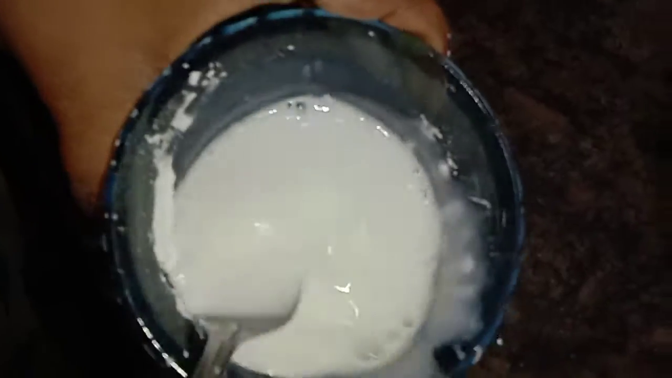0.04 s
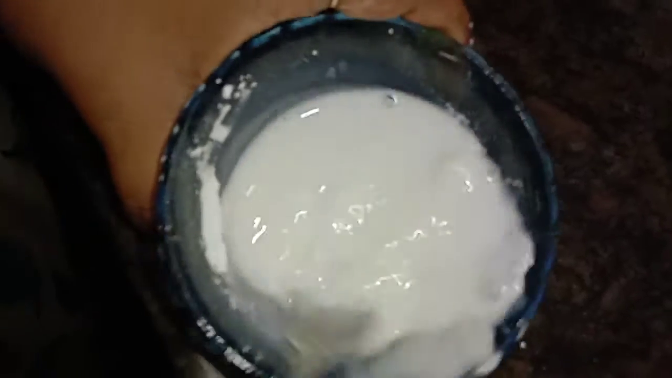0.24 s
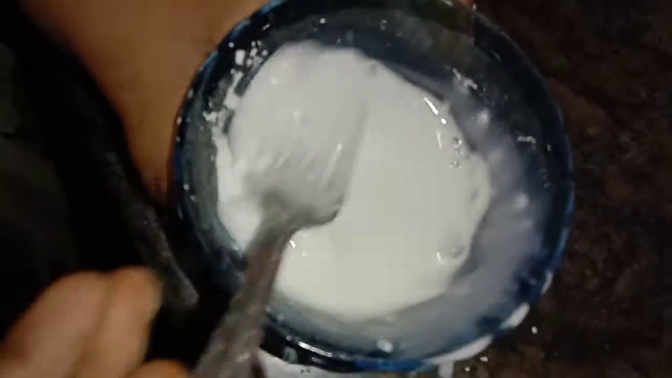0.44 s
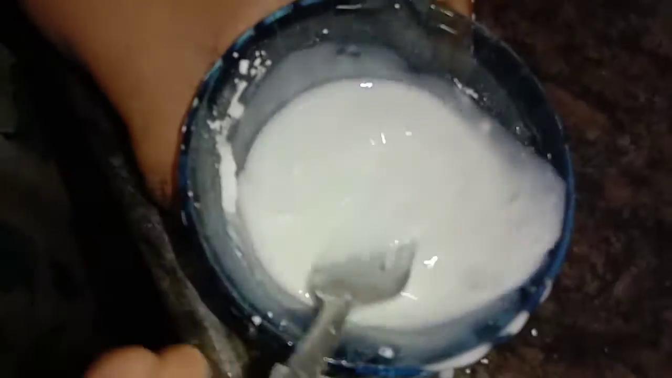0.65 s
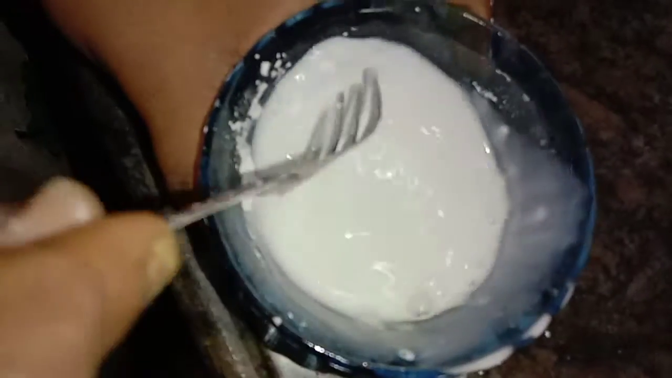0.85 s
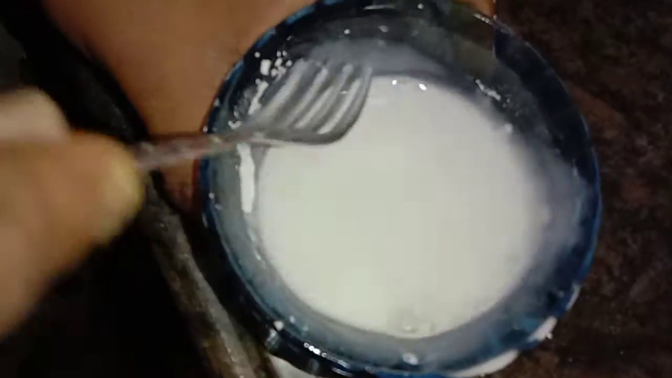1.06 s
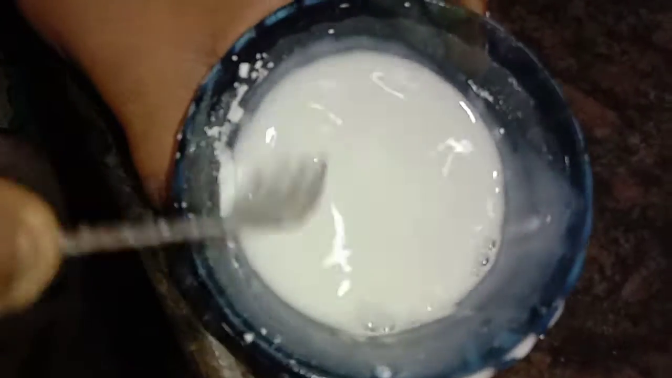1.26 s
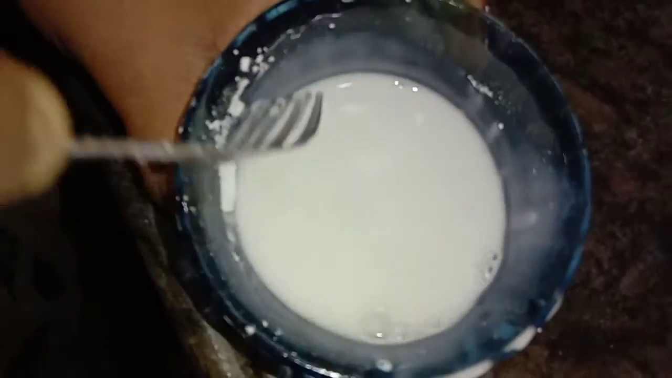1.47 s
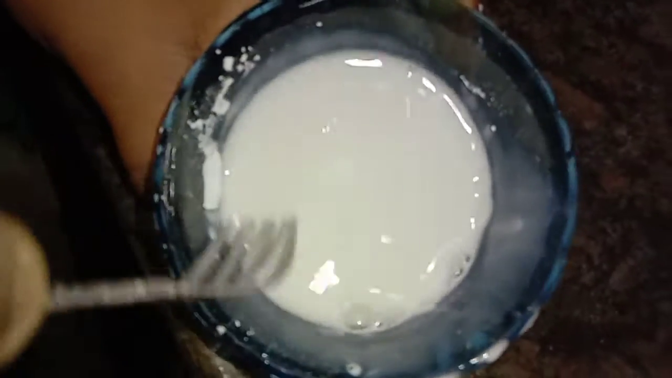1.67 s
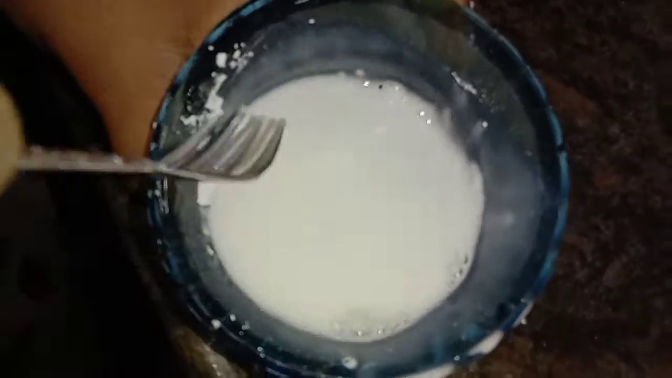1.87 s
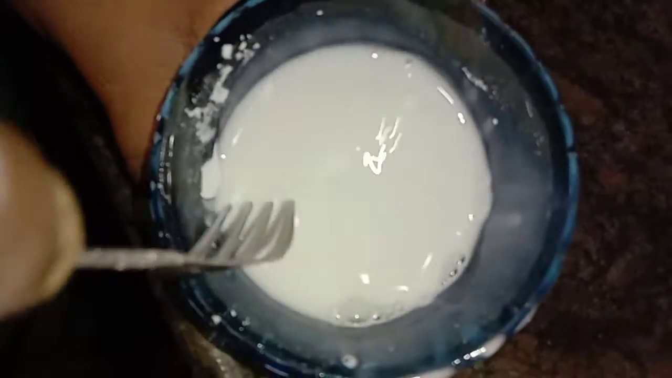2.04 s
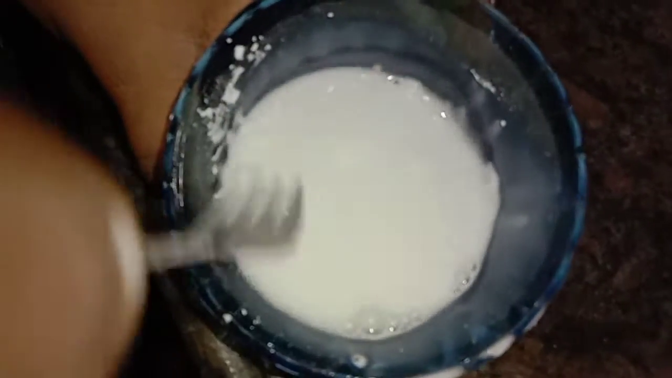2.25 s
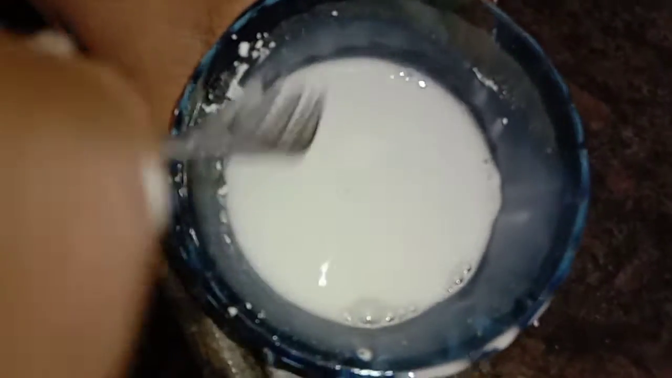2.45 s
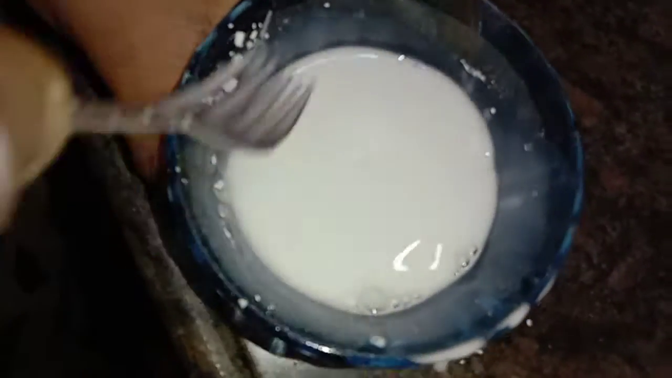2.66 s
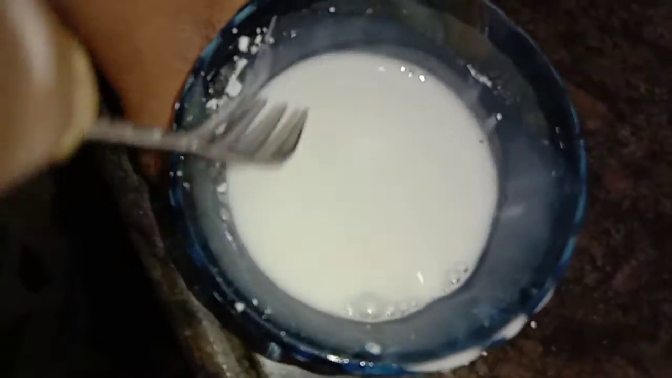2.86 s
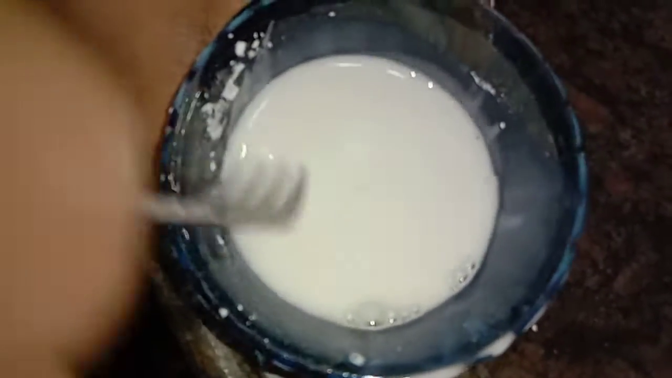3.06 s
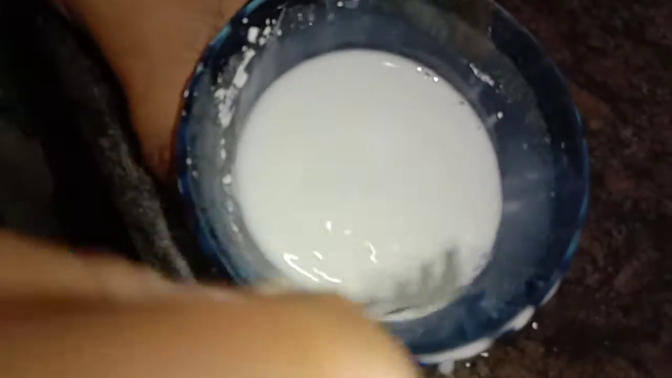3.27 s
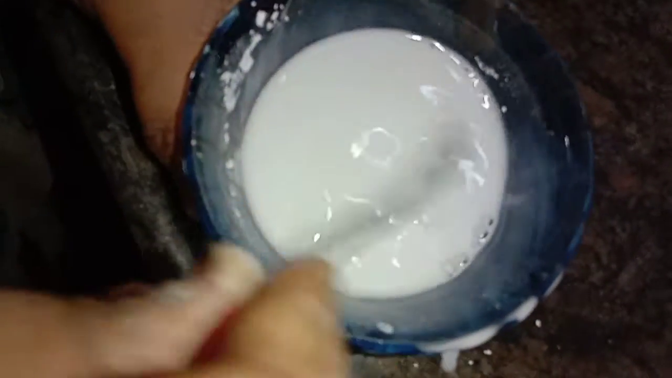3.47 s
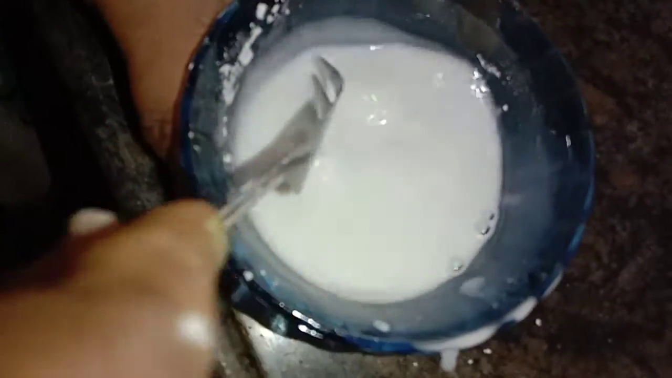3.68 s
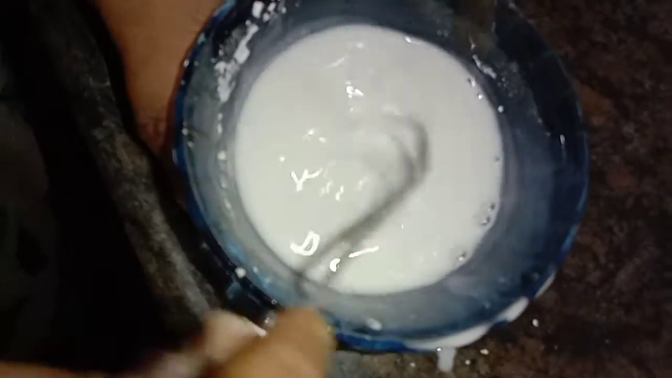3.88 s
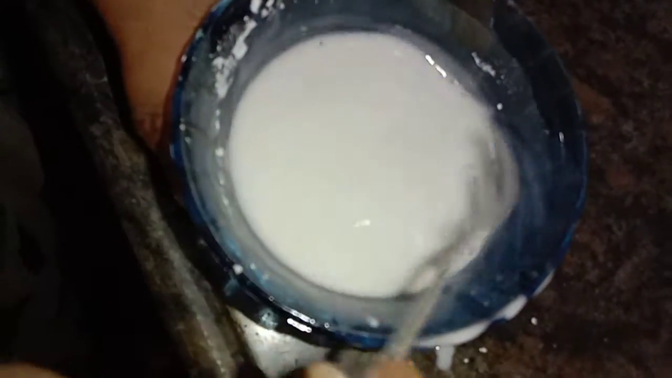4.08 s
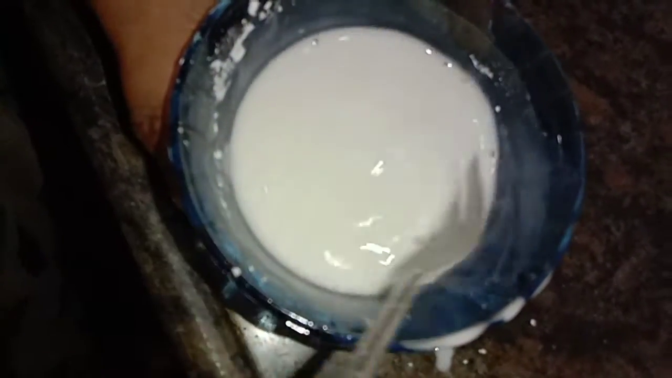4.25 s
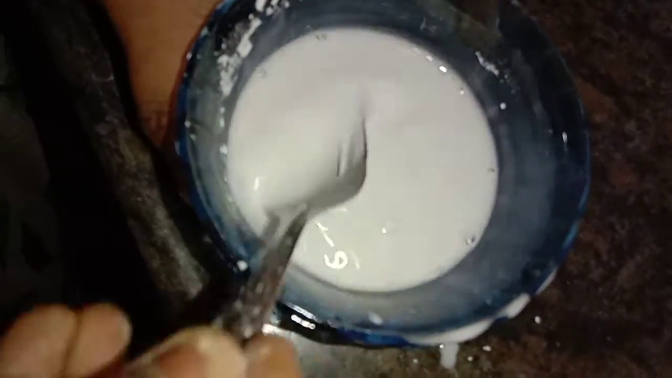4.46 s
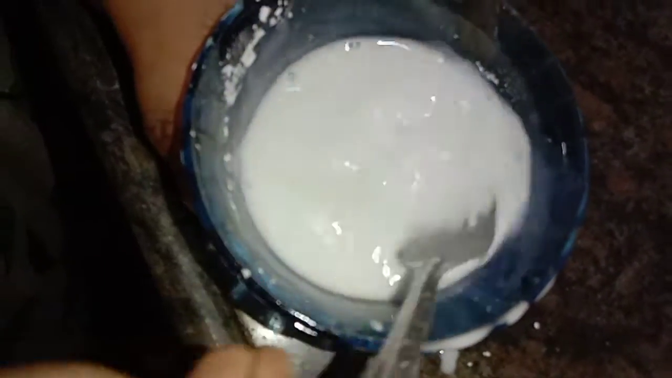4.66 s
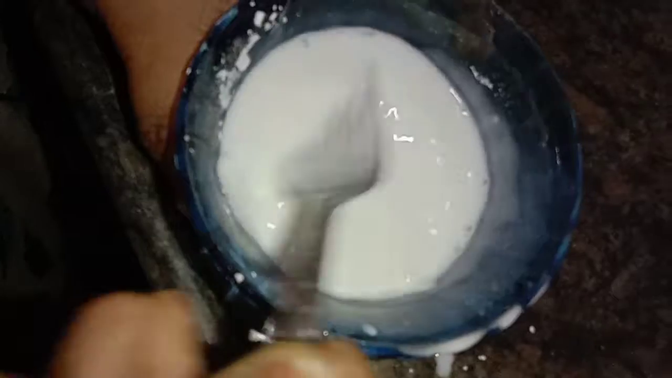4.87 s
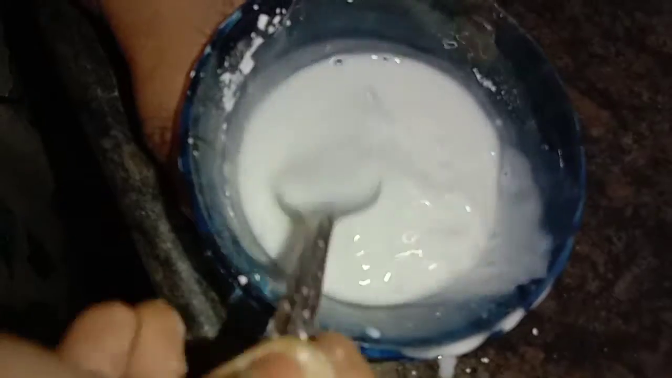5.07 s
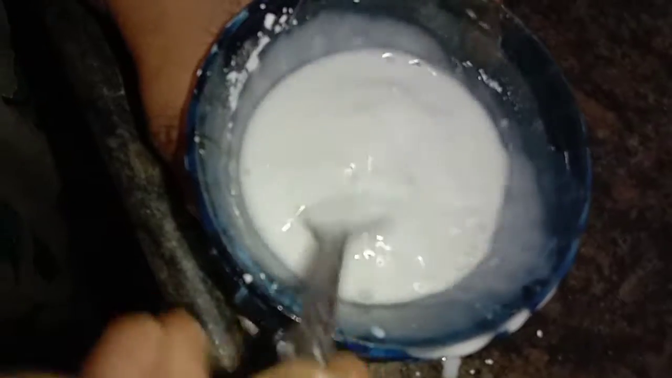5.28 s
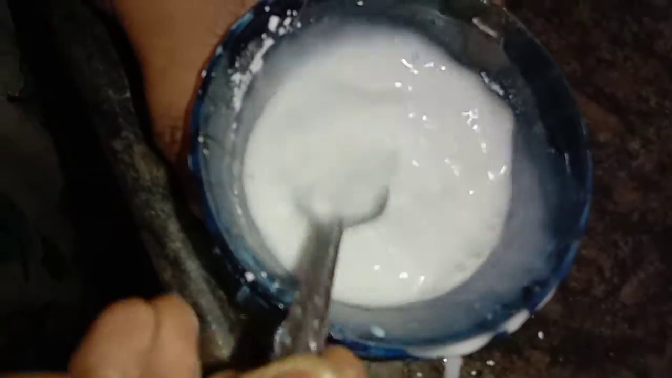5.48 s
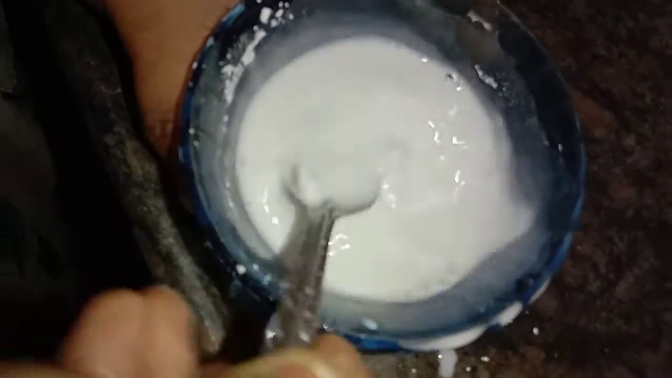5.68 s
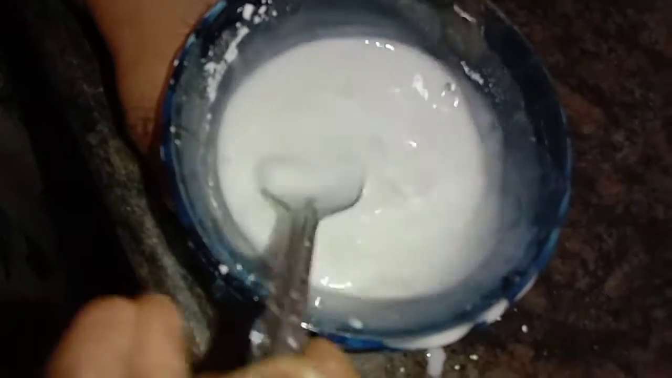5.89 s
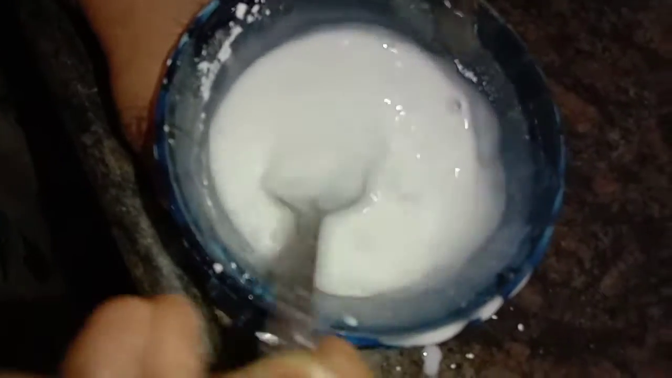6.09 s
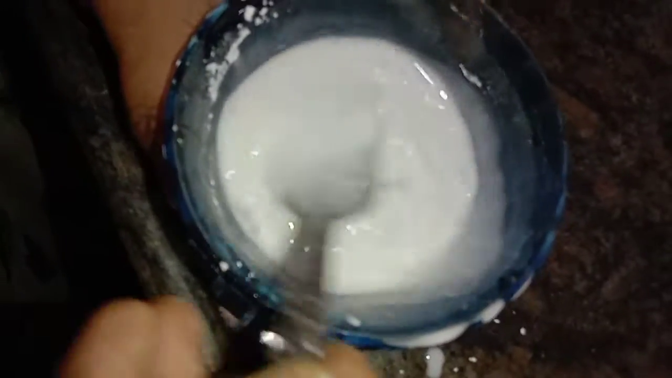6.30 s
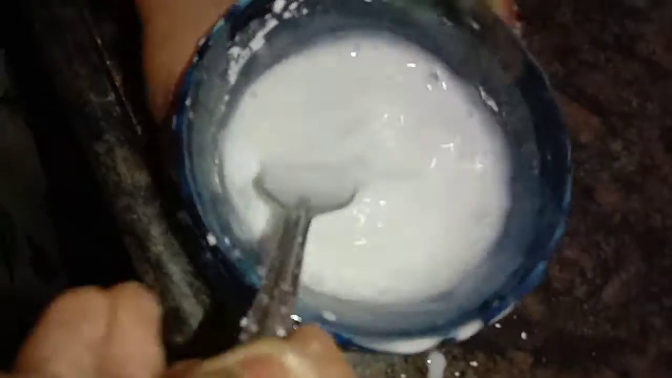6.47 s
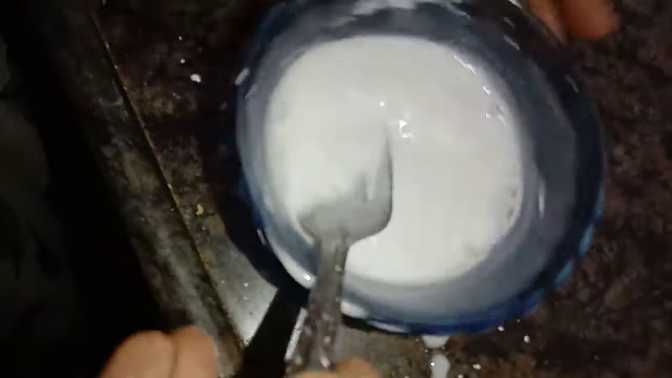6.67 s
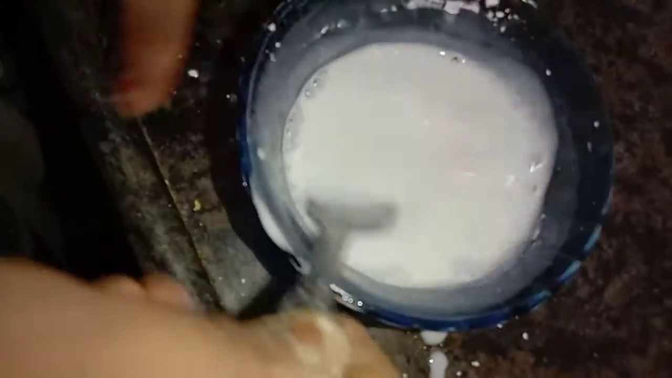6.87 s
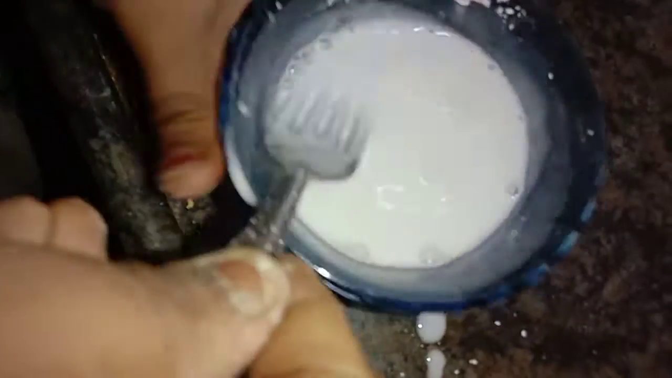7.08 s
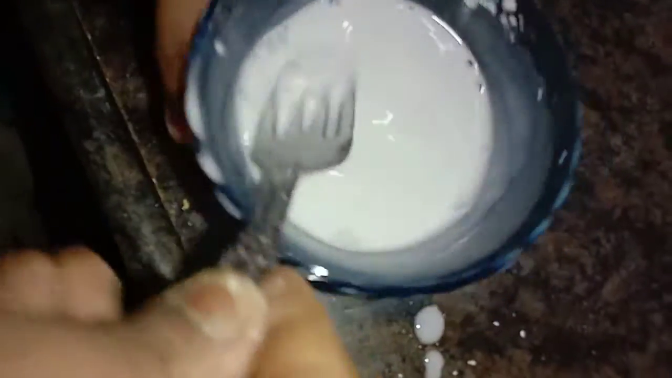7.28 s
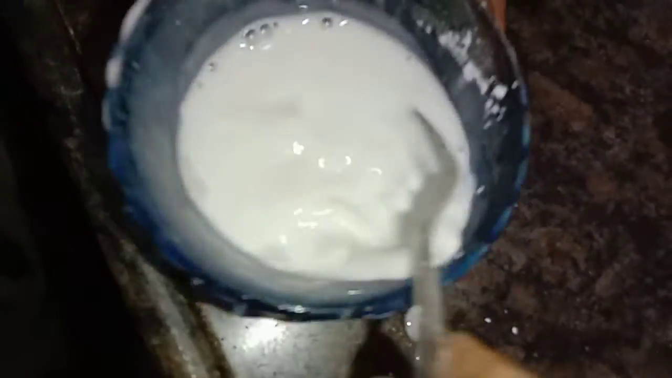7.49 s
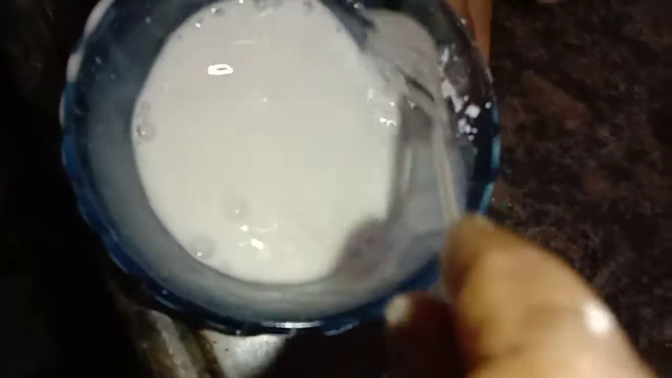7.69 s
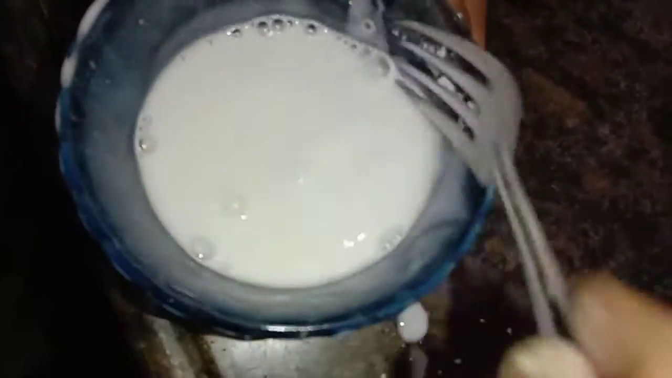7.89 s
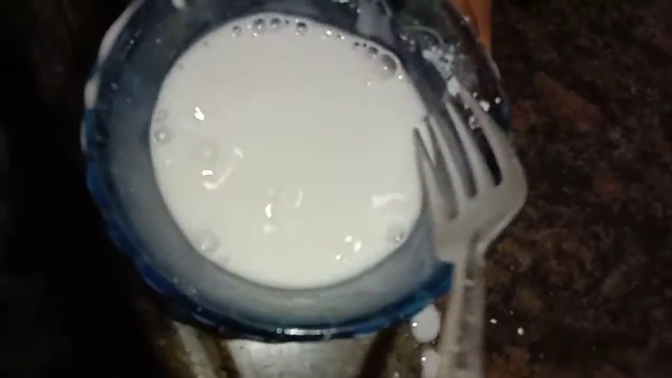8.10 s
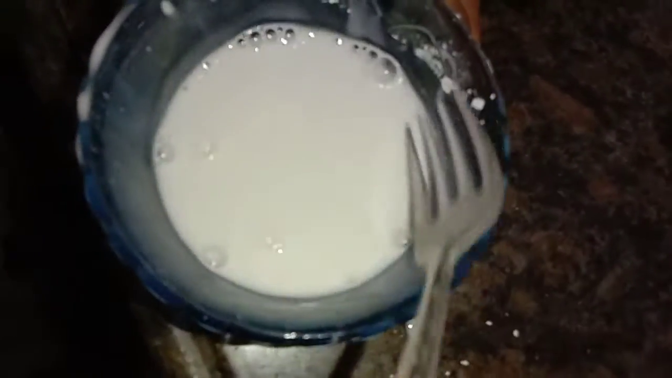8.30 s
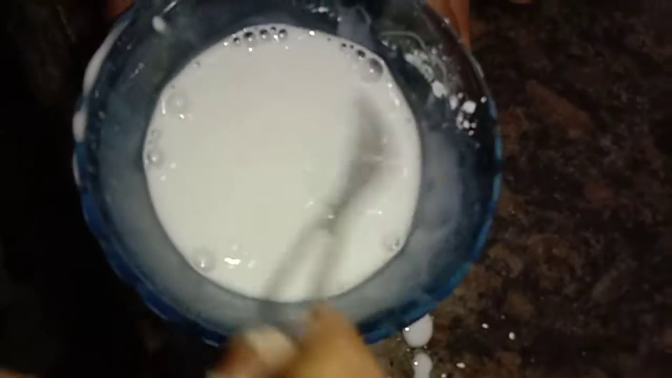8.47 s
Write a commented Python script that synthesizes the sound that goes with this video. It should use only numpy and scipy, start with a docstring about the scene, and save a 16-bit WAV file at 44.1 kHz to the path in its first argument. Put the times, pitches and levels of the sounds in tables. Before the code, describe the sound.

A metal fork clinks and scrapes quickly against a small glass bowl while thin batter sloshes and gulps, over faint household hiss in a hard-walled kitchen.

```python
"""Metal knocks and drags on glass: a fork stirs thin batter in a small hand-held bowl, in a hard-walled kitchen.
Each knock rings the modes of the bowl, damped by batter and hand; uneven slips of the tines ring them too.
Slaps, gulps and ticks are shaped noise and gliding tones; the room answers with noise dying band by band.
Behind lie sloshing, household hiss and hum, all filtered noise, and one thin falling chirp far off.
A look-ahead limiter ducks around loud knocks; the sound is thinned at the bottom and ends steeply near 16 kHz."""
import sys
import numpy as np
from scipy import signal
from scipy.fft import rfft, irfft, next_fast_len
from scipy.io import wavfile
from scipy.ndimage import uniform_filter1d, minimum_filter1d

SR = 44100
rng = np.random.default_rng(int(sys.argv[2]) if len(sys.argv) > 2 else 0)


def waveform_to_disk(signal):
    """Save audio, clipped to [-1, 1], as 16-bit WAV at the path in sys.argv[1]."""
    frames = np.transpose(np.atleast_2d(signal))
    scaled = np.clip(frames, -1, 1) * 32767
    samples = np.round(scaled).astype(np.int16)
    wavfile.write(sys.argv[1], SR, samples)


N = 376613

# Fork on glass. Each row: start in seconds, level of the main treble modes in dB, then low, middle and top
# modes in dB against it, favoured middle and treble pitch in Hz (set by the struck spot), ring length as a factor.
FORK_KNOCKS = [(0.022, -20, -36, -9, -19, 3340, 6000, 0.24), (0.117, -43, 7, 3, -22, 3620, 5700, 1),
               (0.1819, -5.5, -28, -11.5, -8, 3400, 6420, 0.21),
               (0.2744, -6.5, -31, -20, -24, 3120, 4980, 0.41),
               (0.3694, -40, -25, -12, -7, 3300, 7760, 0.78),
               (1.057, -9.5, -29, -12, -7.5, 3460, 7100, 1.5),
               (1.1634, -7, -16, -13.5, -8, 2740, 6410, 0.78),
               (1.1653, -5, -43, -10, -16, 3500, 6570, 0.69),
               (1.235, -13, -16.5, -9.5, -12, 2550, 6600, 2.1),
               (1.452, -26.5, -35, -3, -6, 3500, 8050, 1.8),
               (1.5837, -6.5, -14, -7.5, -4.5, 3550, 6250, 0.59),
               (1.627, -14.5, -24, -13, -14, 3620, 5090, 1.36),
               (1.7657, -37.5, -18, 0.5, -2, 3670, 6370, 1.8),
               (1.7893, -11.5, -23.5, -23.5, -15, 3570, 6450, 0.76),
               (1.8404, -32.5, -24, -5, -5, 3670, 7160, 1.3),
               (1.921, -12.5, -20.5, -9, -14, 3626, 6000, 2.3),
               (1.969, -17.5, -37, -27, -12, 3530, 6900, 0.82),
               (2.068, -26.5, -36, -3.5, -16, 3580, 5350, 3.1),
               (2.232, -0.5, -20, -18.5, -17, 3570, 6430, 0.76),
               (2.371, -24.5, -25, -4, -7, 3590, 4660, 3.2), (2.4019, -26, -2, -1, -1, 3600, 6100, 0.54),
               (2.712, -16.5, -16.5, -10, -7.5, 3650, 6000, 1.4),
               (2.786, -14, -23, -6, -5, 3580, 6350, 0.78),
               (2.8534, -26.5, -15, -8.5, -4.5, 2920, 6050, 1.4),
               (3.0565, -8.5, -24, -12, -7.5, 3570, 6060, 2),
               (3.0799, -10, -26, -14, -9.5, 3580, 5650, 3.5), (3.14, -29, -18, 1, -21, 2684, 5750, 1.3),
               (3.1604, -24, -13, -7.5, 0, 2730, 5020, 1.4), (3.2047, -8, -23, -12.5, -6, 3140, 7020, 0.71),
               (3.216, -14.5, -25, -9, -0.5, 2380, 7430, 1.9), (3.299, -19, -14, -4.5, -9, 3565, 8050, 1.2),
               (3.3468, -37, 20.5, 21, -26, 3080, 5350, 0.45),
               (3.5206, -3, -29.5, -15.5, -12, 3340, 8000, 0.31),
               (3.5336, -24, -29, -2.5, -14, 3080, 4650, 0.63), (3.58, -32, -30, -23, -6, 3300, 7850, 0.6),
               (3.8032, -20, -39, -13, -23, 3410, 5530, 7.5),
               (3.8166, -13, -31, -16.5, -15.5, 3470, 5760, 1.5),
               (3.865, -23, -33, -15, -11, 3080, 7050, 0.95), (4.09, -37, -10, -10, -8, 3280, 7900, 1.4),
               (4.3977, -34.5, -11, -8, -11, 3300, 6100, 1.7),
               (4.627, -16.5, -26.5, -12.5, -6, 3490, 5830, 0.69),
               (4.7334, -7.5, -22, -7.5, -7, 3540, 6340, 0.79),
               (4.7436, -10.5, -15.5, -2.5, -6.5, 3230, 6400, 0.7),
               (4.7679, -5, -23.5, -5, -13, 3623, 6580, 0.92),
               (4.7964, -21.5, -18, -10, -21, 3300, 6400, 2.5),
               (4.934, -22.5, -27, -14, -30, 2780, 7100, 0.98),
               (4.9492, -33, -24, -13, -18, 3150, 5530, 1.4),
               (4.961, -38, -16, -16, -1.5, 2790, 6300, 0.67),
               (5.175, -45, -18, 13.5, -41, 3530, 5050, 0.51), (5.218, -36, -25, 1, -25, 3020, 5150, 0.61),
               (5.2278, -14.5, -15, -8, -10, 3190, 6520, 0.89),
               (5.2356, -14, -7, -4, -13, 3420, 5170, 0.22),
               (5.2434, -15.5, -34, -13, -12, 3590, 6650, 0.6),
               (5.416, -28.5, -32, -15, -2, 2940, 6800, 0.4),
               (5.4633, -9, -51, -12.5, -12, 3140, 5160, 0.58),
               (5.5103, -35, -28, -17, 0, 3280, 12500, 0.27), (5.621, -40.5, -10, 8.5, 1, 3180, 8650, 0.51),
               (5.633, -33, -30, -19, -20, 3020, 6300, .5), (5.6415, -6.5, -32, -15, -15, 3080, 7400, 0.79),
               (5.687, -30.5, -3.5, -7, -21, 3250, 5300, 0.55), (5.7302, -39, -7, 3, -19, 3270, 7100, 0.81),
               (5.809, -28, -25, -14, -19, 3000, 5440, 0.5), (5.813, -34, -24, -14, -17, 3030, 6500, 0.43),
               (5.8269, -5.5, -27, -10.5, -3.5, 3470, 6810, 0.61),
               (5.856, -21.5, -19, -4, -12, 3540, 5000, 0.43), (5.867, -25, -9.5, -1, -7, 2920, 6500, 1.1),
               (5.893, -37, -23, -15, 4, 3220, 6500, 0.5), (5.959, -24.5, -41, -24, -33, 2980, 4950, 0.59),
               (5.998, -32, -25, -14, -17, 3170, 7000, 0.5), (6.002, -37.5, -20, 9, -3, 2960, 7800, 0.5),
               (6.014, -8.5, -21, -8, -6.5, 3620, 4780, 0.68), (6.086, -18, -40, -20, -14, 3030, 7100, 1.4),
               (6.1846, -35, -25, -5, 1, 3200, 7800, 0.5), (6.1979, -6, -17.5, -11.5, -8, 3350, 5500, 0.53),
               (6.266, -11, -20, -10, -5, 3250, 7100, 0.14), (6.362, -41, -30, -20, -4, 3200, 4800, .4),
               (6.3877, -2.5, -18.5, -15.5, -10, 3320, 8040, 0.43),
               (6.3931, -25, -2, 3.5, -10, 3180, 6500, 0.46),
               (6.5237, -36.5, -8, -6, 2.5, 2750, 6000, 0.96),
               (6.553, -29.5, -17, -3.5, -8, 2940, 7700, 1.6), (6.592, -36.5, -15, 2, -8, 3020, 7160, 1.1),
               (6.597, -11.5, -15, -6, -9.5, 3230, 7280, 1.14), (6.609, -39, -10, -2, -10, 3150, 6500, 1),
               (6.634, -33.5, 8.5, 4, -17, 3220, 4900, .8), (6.641, -37, 0, 8, -15, 3250, 5230, 0.87),
               (6.6477, -20, -11, -6.5, -8, 3270, 7260, 2.1), (6.656, -36, -13, 4, -10, 3230, 6500, 1.5),
               (6.688, -37, -6, 0, -9, 3070, 6540, 1.4), (6.696, -28, -20, -4, -8, 2970, 7200, 1.8),
               (6.7762, -23, -33, -5, -11, 3130, 5240, 1), (6.8287, -21.5, -20, -12, -11, 2990, 6720, 2.2),
               (6.844, -21, -18, -22, -10, 2730, 6420, 0.84),
               (7.0322, -15.5, -19.5, -20, -11.5, 3210, 6500, 0.79),
               (7.098, -38, -6, -5, -6, 3250, 6570, 1.2), (7.5352, -16.5, -15, 1, -4, 2790, 9000, 0.49),
               (7.593, -23, -17, -23, -24, 2780, 6850, 0.39),
               (7.881, -2.5, -18, -19, -8.5, 3190, 6460, 0.82),
               (7.9399, -30, -2.5, -1.5, 0, 3240, 6260, 0.86), (7.957, -30, -9, -2, -1, 3030, 6300, 1.9),
               (8.264, -48, -20, -13, -24, 3600, 7000, 0.4), (8.344, -21.5, -20, -8, -1.5, 3510, 6200, 1.3),
               (8.3703, -18, -10.5, -5.5, -16, 3240, 6330, 0.64),
               (8.4136, -47, -20, -10, 4, 3580, 9800, 0.48), (8.513, -36.5, -15, 0.5, -28, 3230, 7800, 1.7)]
# Modes of the glass bowl. Each row: pitch in Hz, width in Hz at ring length 1, level in dB within its zone.
BOWL_MODES = [(870, 580, 7.5), (1013, 123, 23.5), (1170, 100, 6.5), (1425, 55, 15.5), (1590.5, 35, 14.5),
              (1750, 420, -10), (2854, 92, 3.5), (3142, 108, 4), (2530, 360, -1), (3329, 71, -6.5),
              (3550, 130, -10.5), (3600, 56, -7.5), (3955, 46, -17.5), (4930, 115, -10.5), (4985, 170, 1.5),
              (5430, 164, 5), (5870, 65, -4.5), (6390, 176, 5.5), (6010, 280, -11), (6717, 126, -1),
              (7600, 110, -11), (7220, 220, 7.5), (7700, 97, -7), (8800, 96, -6), (9340, 180, -4.5),
              (10390, 540, -1), (9590, 230, -6.5), (11070, 280, -12.5), (13530, 600, -4), (12500, 137, -5),
              (14340, 1800, 7), (14900, 450, -1)]
# Long scrapes along the wall. Each row: start in seconds, level in dB before the favoured modes are lifted,
# length in seconds, favoured pitch in Hz.
WALL_SCRAPES = [(0.0, -56, 0.053, 7360), (0.285, -55, 0.11, 5070), (2.623, -56, 0.088, 9300),
                (0.853, -60, 0.18, 7380), (1.18, -43.5, 0.11, 6260), (1.224, -33.5, 0.09, 2530),
                (1.72, -55, 0.11, 6500), (1.895, -44, 0.12, 6400), (3.002, -50, 0.046, 9300),
                (3.068, -43.5, 0.15, 5400), (4.77, -44.5, 0.14, 6670), (4.983, -43.5, 0.11, 8050),
                (5.83, -44, 0.094, 6650), (6.6, -53, 0.11, 3180), (6.82, -41, 0.043, 6600),
                (7.043, -62, 0.12, 6500), (7.89, -49, 0.17, 5370), (8.145, -55.5, 0.21, 5410)]
STIR_DB = -57     # faint contact between the knocks


def from_db(db):
    """Gain of a level in dB."""
    return 10 ** (np.asarray(db) / 20)


def rms_one(x):
    """Scaled to rms 1."""
    return x / np.sqrt(np.mean(x ** 2) + 1e-20)


def in_time(rows):
    """Each column of a curve table, sample by sample."""
    s, *columns = np.transpose(rows)
    return [np.interp(np.arange(N) / SR, s, column) for column in columns]


def at_hz(points, hz):
    """A curve over pitch, read on a log-frequency axis."""
    points = np.array(points)
    return np.interp(np.log(hz), np.log(points[:, 0]), points[:, 1])


def filtered(x, order, hz, kind="low"):
    """Butterworth filter, low-pass unless told otherwise."""
    return signal.sosfilt(signal.butter(order, hz, kind, fs=SR, output="sos"), x)


def low_noise(hz, shape):
    """Wavering signal: noise below a pitch, rms 1."""
    return rms_one(filtered(rng.standard_normal(shape), 2, hz))


def resonance(x, hz, width):
    """Two-pole resonance with gain 1 on top."""
    r = np.exp(-np.pi * width / SR)
    return signal.lfilter(np.array([1, 0, -1]) * (1 - r * r) / 2, [1, -2 * r * np.cos(2 * np.pi * hz / SR), r * r], x)


def drift(rate):
    """Slow chance of rms 1: noise on every 40th sample through a double one-pole low-pass at rate Hz."""
    r = np.exp(-2 * np.pi * rate * 40 / SR)
    noise = rng.standard_normal(N // 40 + 2002)
    slow = signal.lfilter([1], [1, -2 * r, r * r], noise)[2000:]      # the filter has settled by then
    return np.interp(np.arange(N) / 40, np.arange(len(slow)), rms_one(slow))


def patchy_noise(spectrum, patchy_db, rate, shared):
    """Noise of a given spectrum whose quarter-octave bands swell and sink, partly together; rms 1."""
    size = next_fast_len(N, True)
    hz = np.fft.rfftfreq(size, 1 / SR) + 1
    coloured, out = rfft(rng.standard_normal(size)) * from_db(at_hz(spectrum, hz)), 0
    together = drift(rate)
    for centre in np.arange(np.log2(spectrum[1][0]), np.log2(spectrum[-1][0]) + .25, .25):
        band = np.clip(1 - 4 * np.abs(np.log2(hz) - centre), 0, 1)      # overlapping bands that sum to one
        swell = from_db(patchy_db * (shared * together + drift(rate)))
        out = out + swell * irfft(coloured * band, size)[:N]
    return rms_one(out)


def knocks(scatter_db, detune, favour_db, crack_db, crack_s, rise_cycles, spread_s):
    """The tines land one after another: each mode starts with one of them, each adds a short crack of noise."""
    # Zones in which the modes are levelled, from deepest to top. Each row: lower edge in Hz, upper edge in Hz.
    zones_hz = [(750, 1250), (1300, 2200), (2400, 3400), (3450, 4000), (4700, 8200), (8400, 15500)]
    deepest_db, crest_db = -11, 4.5     # deepest modes against the low ones; lift of all zones but the treble
    split_hz, lean_hz, lean_db = 3514, 143, 10   # middle modes lean to the favoured pitch's side of the split
    treble_favour, favour_reach = 0.5, 0.1      # treble modes stand out less; reach in log pitch
    press_s = 0.018      # the tines stay pressed on the glass a moment
    ring_on, treble_ring_on, top_ring_on = 0.41, 0.35, 0.15      # share of each ring that outlasts the press
    chatter, chatter_hz = 0.48, 143     # tines resting on the glass make each ring waver
    attack_s = 0.00068     # wet tines bed into the glass

    out, t = np.zeros(N + SR), np.arange(int(.1 * SR)) / SR
    hz, width, mode_db = np.transpose(BOWL_MODES)
    count = len(FORK_KNOCKS)
    level_chance, pitch_chance = rng.standard_normal((2, count, len(hz)))
    tines = np.sort(rng.random((count, 4)) ** 2)
    tines = (tines - tines[:, :1]) * spread_s
    which = np.maximum(rng.integers(0, 4, (count, len(hz))) - 1, 0)      # the first tine starts half the modes
    since = t - tines[:, :, None]
    crack_shape = (np.exp(-np.abs(since) / crack_s) * (since > 0)).sum(axis=1)
    snap = rng.standard_normal((count, len(t))) * crack_shape
    cracks = [filtered(snap, 4, zone, "band") for zone in zones_hz]
    waver = low_noise(chatter_hz, (64, len(t)))
    lasting = np.select([hz > zones_hz[5][0], hz > zones_hz[4][0]], [top_ring_on, treble_ring_on], ring_on)[:, None]

    for k, (s, db, low_db, middle_db, top_db, low_hz, high_hz, length) in enumerate(FORK_KNOCKS):
        lean = .5 + .5 * np.tanh((low_hz - split_hz) / lean_hz)
        lower_middle_db, upper_middle_db = middle_db - lean_db * lean, middle_db - lean_db * (1 - lean)
        zones_db = crest_db + np.array([low_db + deepest_db, low_db, lower_middle_db, upper_middle_db,
                                        -crest_db, top_db])
        # the batter's load shifts the modes a little
        pitch = hz * (1 + detune * np.minimum(hz / 4000, 1) * pitch_chance[k])
        near = 0
        for spot, share in ((low_hz, 1), (high_hz, treble_favour)):
            pitch[np.abs(hz - spot).argmin()] = spot      # the nearest mode is pulled to the favoured pitch
        for spot, share in ((low_hz, 1), (high_hz, treble_favour)):
            near = near + share * np.exp(-(np.log(pitch / spot) / favour_reach) ** 2)

        age = np.maximum(since[k, which[k]], 0)
        swell = 1 - np.exp(-hz[:, None] * age / rise_cycles)      # low modes build up later
        decay = np.exp(-np.pi * width[:, None] / max(length, .2) * age)
        rings = swell * decay * np.sin(2 * np.pi * pitch[:, None] * age)
        scatter = scatter_db * np.clip(1 - near, 0, 1) * level_chance[k]
        rings *= from_db(mode_db + favour_db * near + scatter)[:, None]
        rings *= lasting + (1 - lasting) * np.exp(-age / press_s)
        wobble = waver[(k + np.arange(len(hz))) % len(waver)]
        rings *= 1 + chatter * np.minimum(age * chatter_hz, 1) * wobble

        for (low, high), zone_db, crack in zip(zones_hz, zones_db, cracks):
            ring = rings[(hz > low) & (hz < high)].sum(axis=0)
            ring = ring / np.abs(ring).max()
            ring = ring + from_db(crack_db) * crack[k] / np.abs(crack[k]).max()
            ring = np.minimum(t / attack_s, 1) * ring / np.abs(ring).max()
            out[round(s * SR):][:len(t)] += from_db(db + zone_db) * ring
    return out[:N]


def pressure():
    """How hard the tines drag: faint contact with a dying skid after each knock; a rounded swell per scrape."""
    skid_db, skid_swell_s, skid_t60_s = -31, 0.017, 0.26      # level against the knock
    t = np.arange(N) / SR
    skids = from_db(STIR_DB + 3 * drift(16.0))
    after = t[:SR // 2]
    skid = np.minimum(after / skid_swell_s, 1) * from_db(skid_db - 60 * after / skid_t60_s)
    for s, db, *_ in FORK_KNOCKS:
        start = round(s * SR)
        skids[start:][:len(skid)] += from_db(db) * skid[:N - start]
    scrapes = [from_db(db) * np.sin(np.pi * np.clip((t - s) / length, 0, 1)) for s, db, length, _ in WALL_SCRAPES]
    return skids, np.array(scrapes)


def drag(per_s, uneven_db):
    """Dense uneven slips of the tines excite the bowl's modes, widened by the contact."""
    bright_db_per_octave, bright_follows = 3.5, 0.077     # at rest; harder drag is brighter, per dB
    favour_db, favour_reach = 28, 0.064     # lift of the modes near a scrape's pitch; reach in log pitch
    skids, scrapes = pressure()
    harder_db = 20 * np.log10(skids + scrapes.sum(axis=0)) - STIR_DB
    tilt_db = bright_db_per_octave + bright_follows * harder_db
    strength = from_db(uneven_db * np.minimum(rng.exponential(1, N), 4))
    slips = (rng.random(N) < per_s / SR) * strength * rng.choice([-1, 1], N)
    out, spots = 0, np.array(WALL_SCRAPES)[:, 3]
    for hz, width, db in BOWL_MODES:
        favour = from_db(favour_db * np.exp(-(np.log(hz / spots) / favour_reach) ** 2))
        level = skids + favour @ scrapes
        ring = rms_one(resonance(slips, hz, 3 * width))
        out = out + level * from_db(db + tilt_db * np.log2(hz / 6000)) * ring
    out = filtered(out, 1, 8000)      # batter mutes the top of the drag
    return out / np.sqrt(np.sum(from_db(np.array(BOWL_MODES)[:, 2]) ** 2))


def sings():
    """A mode sings on where hand and batter leave it free: a steady pitch that swells, wavers and dies."""
    # Free modes. Each row: start in seconds, level in dB before the decay, pitch in Hz, swell in seconds,
    # time to fall 60 dB in seconds.
    free_modes = [(4.769, -16, 3710, 0.0022, .06), (4.786, -19, 3711, 0.018, 0.24),
                  (4.78, -30, 6350, 0.036, 0.36), (6.632, -30.5, 3200, .006, 0.3),
                  (5.3, -30, 3150, .006, .2), (8.4, -26, 1600, .004, .12),
                  (5.688, -24.5, 1270, 0.0045, 0.074), (1.585, -24.5, 1500, 0.003, .2)]
    out, t = np.zeros(N + SR), np.arange(SR // 2) / SR
    waver = low_noise(40, (len(free_modes), len(t)))
    for (s, db, hz, swell, t60), wobble in zip(free_modes, waver):
        shape = np.minimum(t / swell, 1) * from_db(db - 60 * t / t60) * (1 + 0.42 * wobble)
        out[round(s * SR):][:len(t)] += shape * np.sin(2 * np.pi * hz * t)
    return out[:N]


def slaps(sharpness):
    """Batter slaps and clunks: noise in one broad resonance and one narrow ring of the bowl, swelling and dying."""
    # Batter slaps the wall and the bowl clunks in the hand. Each row: start in seconds, level in dB before
    # the decay, centre in Hz, time to fall 60 dB in seconds, low bowl ring in Hz, ring in dB against the slap.
    wall_slaps = [(0.187, -35, 1180, 0.095, 1570, 5), (0.276, -43.5, 1300, 0.26, 1588, 6),
                  (0.117, -28, 880, 0.14, 1280, -17), (1.163, -28, 1610, 0.17, 1440, -9),
                  (1.597, -38.5, 1080, 0.19, 1066, 8), (1.924, -43, 1100, 0.16, 1044, 12.5),
                  (2.235, -38, 740, 0.29, 1400, -9), (2.389, -42, 1030, 0.31, 1030, -0.5),
                  (3.058, -34, 960, 0.2, 965, -9), (3.21, -41.5, 1320, 0.11, 1616, 17),
                  (3.344, -18.5, 1280, 0.079, 1495, -7), (4.744, -25.5, 1310, 0.074, 1360, 2),
                  (5.232, -27.5, 960, 0.26, 1173, -8), (5.686, -31, 1120, 0.12, 1260, -4),
                  (5.83, -33, 980, 0.18, 1074, 0), (6.02, -20, 1100, 0.15, 1020, -20),
                  (6.2, -19, 1030, 0.12, 1152, -25), (6.388, -36, 1200, 0.22, 1350, 9),
                  (6.41, -42, 586, 0.27, 786, 8), (6.57, -35.5, 1220, 0.29, 1540, -5),
                  (6.598, -32.5, 835, 0.39, 1580, -5), (6.62, -34, 880, 0.23, 950, -15),
                  (6.641, -35.5, 1120, 0.3, 1390, -16), (6.665, -30.5, 810, 0.21, 1010, -18),
                  (6.689, -38, 730, 0.15, 764, -12), (7.886, -47.5, 1500, 0.41, 1525, 12)]
    ring_width_hz, swell_cycles = 8.8, 8.4
    out, t = np.zeros(N + SR), np.arange(int(.3 * SR)) / SR
    for s, db, hz, t60, ring_hz, ring_db in wall_slaps:
        noise = rng.standard_normal(len(t))
        body = rms_one(resonance(resonance(noise, hz, hz / sharpness), hz, hz / sharpness))
        body += from_db(ring_db) * rms_one(resonance(noise, ring_hz, ring_width_hz))
        shape = from_db(db - 60 * t / t60) * np.minimum(t * hz / swell_cycles, 1)
        out[round(s * SR):][:len(t)] += shape * body
    return out[:N]


def gulps(rise, flutter_hz):
    """An air pocket closes: a soft wavering tone that climbs as the pocket shrinks."""
    # Batter gulps round the fork. Each row: start in seconds, level in dB before the flutter,
    # pitch in Hz at 30 % of the gulp, length in seconds.
    air_pockets = [(0.108, -34, 493, 0.049), (0.169, -38, 472, .045), (0.228, -42.5, 486, 0.047),
                   (0.906, -48, 330, 0.04), (1.1, -50, 504, 0.044), (1.3, -49, 510, 0.095),
                   (1.367, -50, 192, 0.084), (2.098, -49.5, 194, 0.074), (2.482, -38.5, 205, 0.025),
                   (2.719, -44.5, 227, 0.065), (3.032, -46, 297, 0.079), (3.242, -42.5, 373, 0.11),
                   (3.336, -39, 476, 0.066), (3.777, -49.5, 227, 0.074), (4.225, -50, 314, 0.1),
                   (4.297, -45, 390, 0.064), (4.626, -52, 304, 0.065), (4.655, -43, 212, 0.07),
                   (5.258, -38.5, 387, 0.036), (5.87, -51, 507, 0.066), (6.41, -44, 464, 0.049),
                   (6.653, -43.5, 457, 0.073), (6.901, -46.5, 347, 0.08), (7.109, -50.5, 309, 0.095),
                   (7.16, -58, 496, 0.11), (7.326, -51, 561, 0.12), (7.499, -57, 137, 0.091),
                   (7.708, -50.5, 406, 0.24), (8.02, -63, 435, 0.052), (8.16, -45.5, 533, 0.13),
                   (8.254, -44.5, 646, 0.11), (8.343, -42.5, 397, 0.057), (8.438, -51, 385, 0.12)]
    out = np.zeros(N + SR)
    flutter = low_noise(flutter_hz, N + SR)
    for s, db, hz, length in air_pockets:
        part = np.arange(int(length * SR)) / (length * SR)
        tone = np.sin(2 * np.pi * np.cumsum(hz * (1 + rise * (part - .3))) / SR)
        out[round(s * SR):][:len(part)] += from_db(db) * np.sin(np.pi * np.sqrt(part)) * tone
    return (out * (1 + 0.48 * flutter))[:N]


def spatter():
    """Tiny drops tick on the glass: short puffs of treble noise at sparse random moments."""
    per_s, level_db, spread_db, decay_s = 7., -50, 5.1, 0.0032      # level before the high-pass
    drops = (rng.random(N) < per_s / SR) * from_db(level_db + spread_db * rng.standard_normal(N))
    shape = signal.lfilter([1], [1, -np.exp(-1 / (decay_s * SR))], drops + 1e-18)
    return filtered(shape * rng.standard_normal(N), 2, 5400, "high")


def slosh():
    """Batter sloshes and the hand bumps the bowl: patchy noise, split at 180 Hz into two levels."""
    # Sloshing and hand. Each row: time in seconds, slosh level in dB, low bumps level in dB.
    slosh_curve = [(0.0, -46.5, -73), (0.16, -58, -53), (0.36, -54.5, -67), (0.73, -64.5, -80),
                   (1.05, -54.5, -69), (1.24, -66, -58.5), (1.64, -56, -70), (2.43, -48.5, -65),
                   (2.76, -58, -68), (3.04, -55.5, -62), (3.21, -49, -62), (3.35, -45, -80),
                   (3.64, -53, -64), (3.99, -59, -71.5), (4.5, -57.5, -73), (4.83, -51.5, -60),
                   (4.99, -62, -68), (5.45, -60.5, -71.5), (6.59, -52.5, -68), (6.87, -59, -63),
                   (7.11, -56.5, -77), (7.75, -53, -70), (8.04, -52.5, -64), (8.54, -49, -72)]
    # Spectrum of both. Each row: pitch in Hz, relative density in dB.
    rumble_spectrum = [(18, -40), (30, -40), (62, 8), (113, 6), (201, 2.5), (262, -3), (388, -2),
                       (620, -7.5), (850, -17), (1100, -47)]
    slosh_db, bump_db = in_time(slosh_curve)
    rumble = patchy_noise(rumble_spectrum, patchy_db=5.0, rate=5.0, shared=0.8)
    bumps = signal.sosfiltfilt(signal.butter(3, 180, fs=SR, output="sos"), rumble)
    return from_db(slosh_db) * rms_one(rumble - bumps) + from_db(bump_db) * rms_one(bumps)


def chirp(rough_hz):
    """A falling, fluttering whistle of two strands: gliding tones times narrow noise."""
    upper, lower = (.597, -40.5, 7540), (0.66, -52, 6950)      # start in s, level in dB, starting pitch in Hz
    sag_hz_per_s, attack_s, hold_s, t60_s = 1400, 0.012, 0.044, 0.47
    out = 0
    for s, db, hz in (upper, lower):
        age = np.maximum(np.arange(N) / SR - s, 0)
        shape = np.minimum(age / attack_s, 1) * from_db(db - 60 * np.maximum(age - hold_s, 0) / t60_s)
        tone = np.sin(2 * np.pi * (hz - .5 * sag_hz_per_s * age) * age)
        out = out + shape * low_noise(rough_hz, N) * tone
    return out


def household_hiss():
    """Household hiss that rises and falls: noise whose bands swell and sink in patches."""
    # Level of the hiss. Each row: time in seconds, level in dB.
    hiss_curve = [(0.0, -43), (0.21, -42.5), (0.52, -46), (1.71, -44.5), (2.38, -43), (2.59, -45.5),
                  (3.09, -42), (3.26, -40.5), (3.59, -45.5), (3.88, -46.5), (4.47, -46), (4.92, -41.5),
                  (5.23, -46.5), (6.09, -44), (6.61, -41.5), (6.87, -45.5), (8.06, -42), (8.54, -44.5)]
    # Its average spectrum. Each row: pitch in Hz, relative density in dB.
    hiss_spectrum = [(500, -116), (850, -8), (904, 0.5), (1020, 8.5), (1150, 4.5), (1350, 7.5), (1800, -2),
                     (2050, 3), (2400, -1), (3000, 4.5), (3600, -2), (3880, -16), (4200, -34), (4700, -18),
                     (5560, -7.5), (6940, -9), (8140, -11), (9440, -23), (11500, -28), (13500, -47),
                     (16000, -38)]
    (hiss_db,) = in_time(hiss_curve)
    return from_db(hiss_db) * patchy_noise(hiss_spectrum, patchy_db=3.3, rate=6.0, shared=0.3)


def hum():
    """Wavering household hum: noise in narrow resonances, each drifting in level."""
    # Hum strands. Each row: pitch in Hz, width in Hz, level in dB around which it drifts.
    hum_strands = [(199, 38, -76.5), (303, 18, -68.5), (383.5, 11, -68.5), (506.4, 15, -60.5)]
    out = 0
    for hz, width, db in hum_strands:
        strand = rms_one(resonance(rng.standard_normal(N), hz, width))
        out = out + from_db(db + 1.45 * drift(25.0)) * strand
    return out


def kitchen(x, first_wall_s):
    """Diffuse echoes after the first wall: noise that dies band by band."""
    # Reverberation of the hard-walled room. Each row: pitch in Hz, time to fall 60 dB in seconds.
    room_t60 = [(500, 0.52), (1300, 0.28), (3500, 0.36), (9000, 0.26), (15000, 0.27)]
    t = np.arange(int(.6 * SR)) / SR
    hz, tail = np.fft.rfftfreq(len(t), 1 / SR) + 1, 0
    white = rfft(rng.standard_normal(len(t)))
    for centre in np.arange(7, 15.):      # octave bands, 128 Hz to 16 kHz
        band = np.clip(1 - np.abs(np.log2(hz) - centre), 0, 1)
        tail = tail + irfft(white * band, len(t)) * from_db(-60 * t / at_hz(room_t60, 2 ** centre))
    tail = tail * np.clip(t / first_wall_s - 1, 0, 1)
    return signal.fftconvolve(x, tail / np.sqrt(np.sum(tail ** 2)))[:N]


def scene():
    """Bowl and chirp with the kitchen's answer, over sloshing and household noise; singing modes stay dry."""
    bowl = knocks(scatter_db=3.5, detune=0.012, favour_db=22.5, crack_db=-10.0, crack_s=0.0037,
                  rise_cycles=5.3, spread_s=.0022)
    bowl += drag(per_s=1500., uneven_db=2.5)
    bowl += slaps(sharpness=1.35) + gulps(rise=0.28, flutter_hz=42.0) + spatter()
    far = chirp(rough_hz=150)
    # the far chirp sends more of itself into the room than the bowl does
    room = kitchen(from_db(-9.0) * bowl + from_db(3.0) * far, first_wall_s=0.0032)
    background = slosh() + household_hiss() + hum()
    return (bowl + sings() + far + room + background)[None]


def record(dry):
    """A limiter sees peaks coming, ducks at once and recovers steadily; bass is thinned, the top ends steeply."""
    ahead = int(0.0355 * SR)
    release = 200. / SR * np.arange(N)      # recovery of 200 dB per s
    # 47 % of what exceeds -5 dB is taken off
    over_db = np.maximum(20 * np.log10(np.abs(dry[0]) + 1e-9) + 5, 0) * 0.47
    held = -minimum_filter1d(-over_db, ahead, origin=-(ahead // 2), mode="nearest")
    duck_db = np.maximum.accumulate(held + release) - release
    limited = dry * from_db(-uniform_filter1d(duck_db, size=60))
    heard = signal.sosfilt(signal.cheby2(12, 28, 15700, fs=SR, output="sos"), limited)
    heard = heard - 0.11 * resonance(heard, hz=4320, width=49)      # the microphone port dips here
    heard = heard - 0.31 * resonance(heard, hz=11700, width=500)
    heard = filtered(heard, 1, 55, "high")
    return signal.sosfilt(signal.cheby2(12, 50, 16800, fs=SR, output="sos"), heard)      # steep upper edge


dry = scene()
out = record(dry)
waveform_to_disk(out)
```